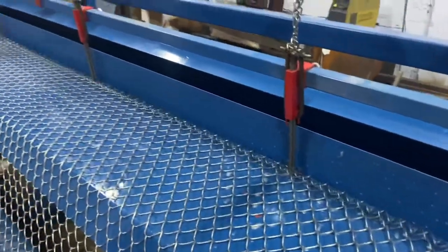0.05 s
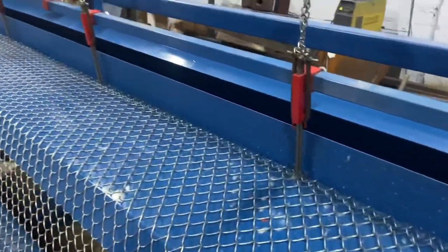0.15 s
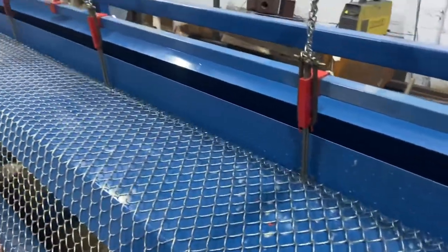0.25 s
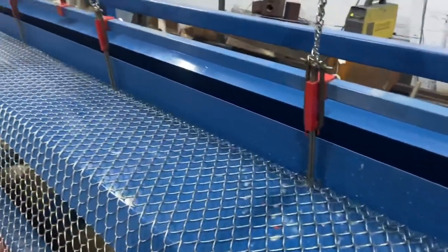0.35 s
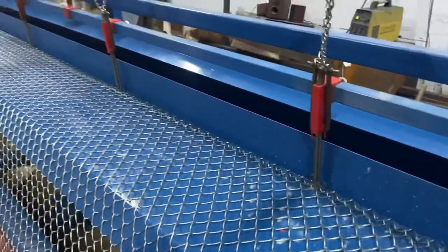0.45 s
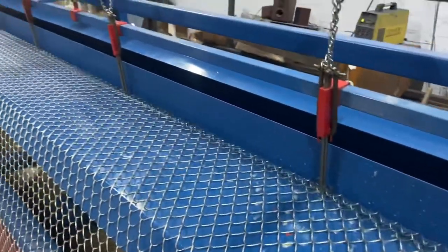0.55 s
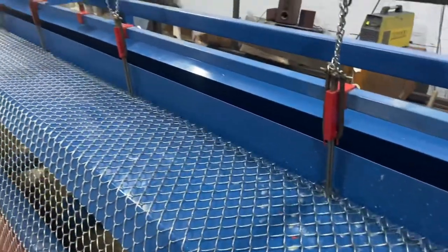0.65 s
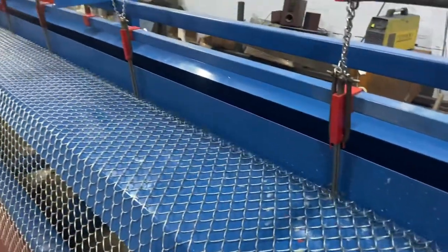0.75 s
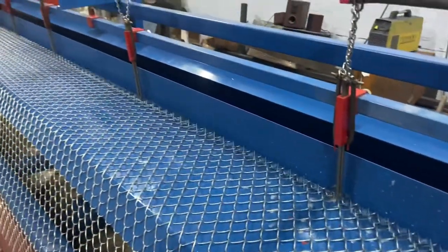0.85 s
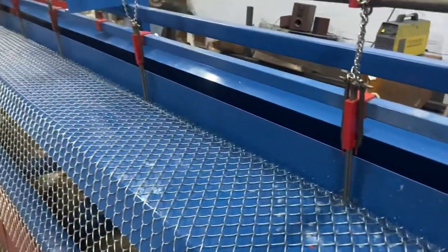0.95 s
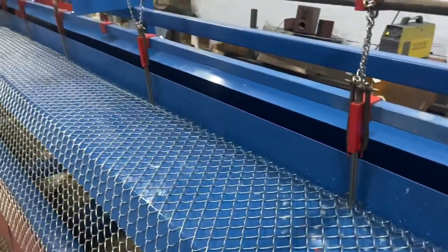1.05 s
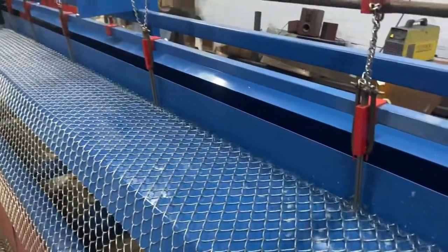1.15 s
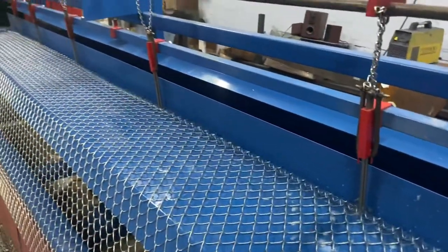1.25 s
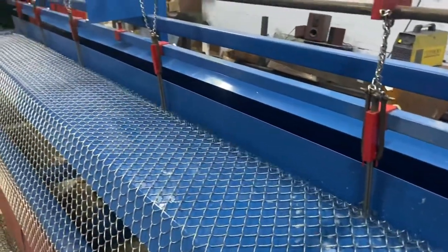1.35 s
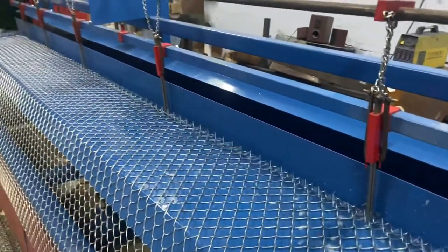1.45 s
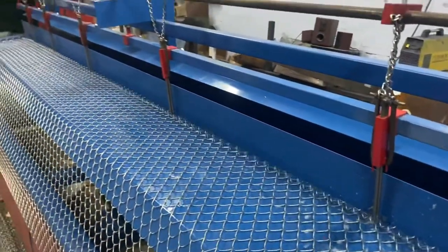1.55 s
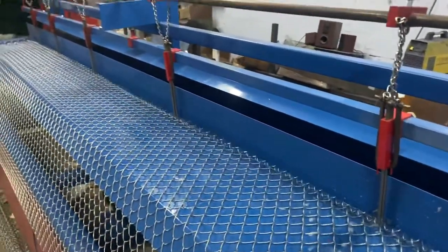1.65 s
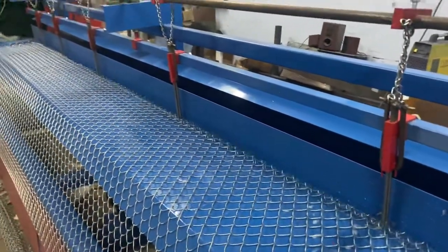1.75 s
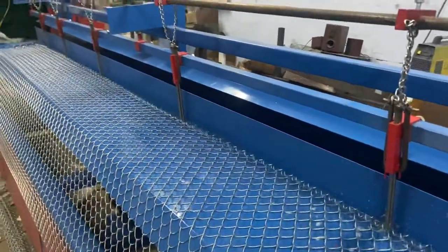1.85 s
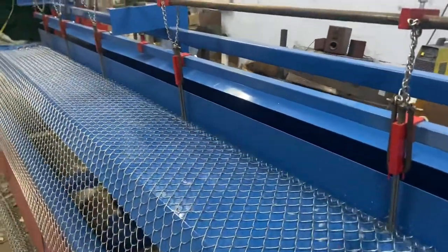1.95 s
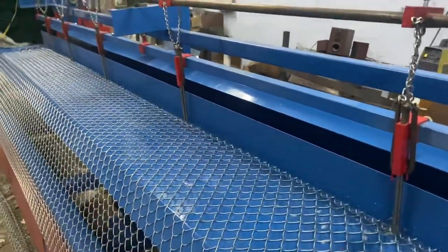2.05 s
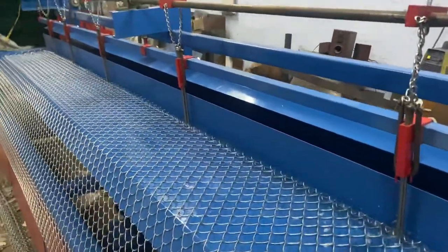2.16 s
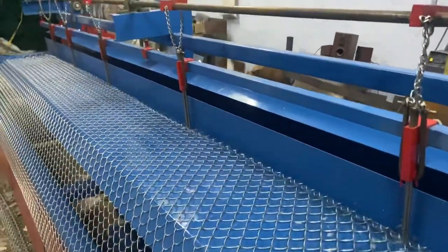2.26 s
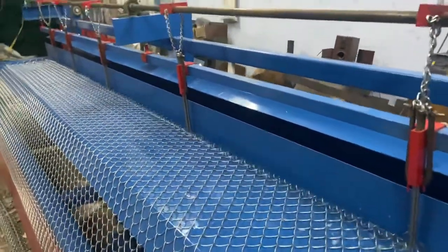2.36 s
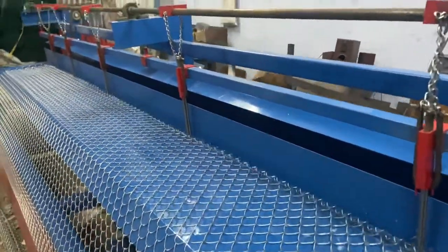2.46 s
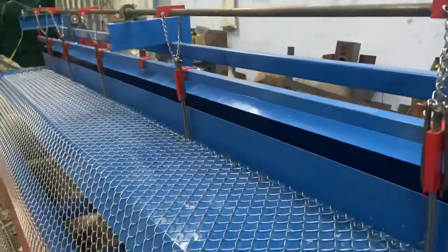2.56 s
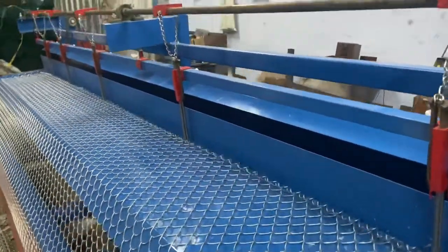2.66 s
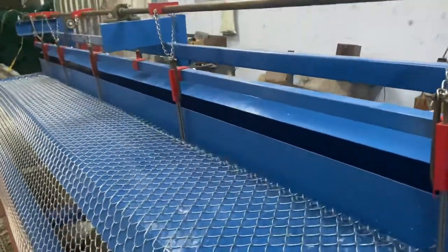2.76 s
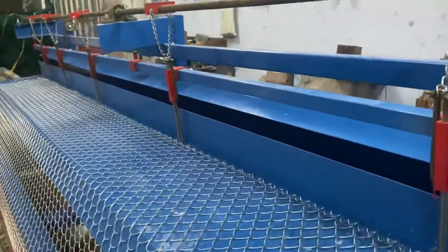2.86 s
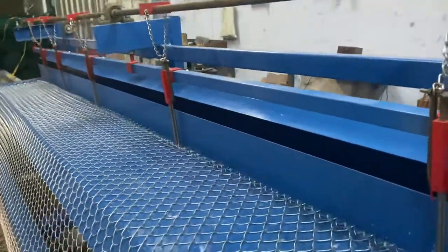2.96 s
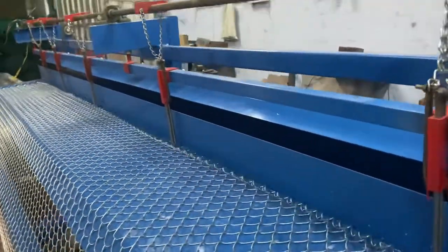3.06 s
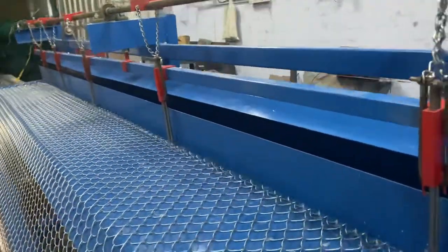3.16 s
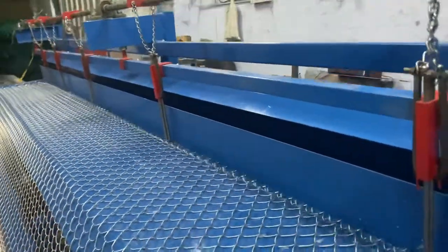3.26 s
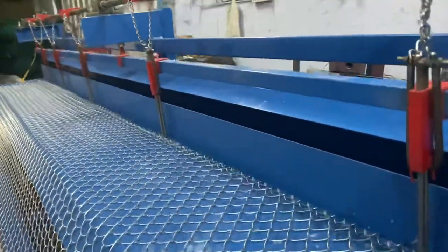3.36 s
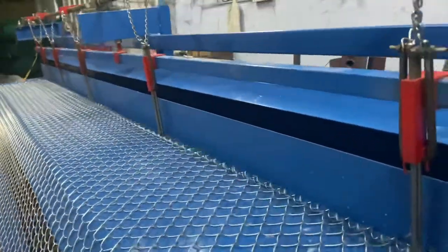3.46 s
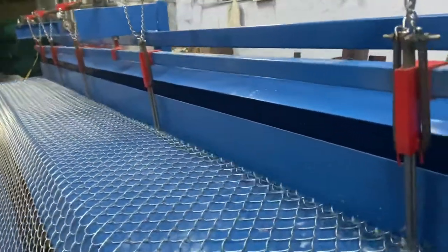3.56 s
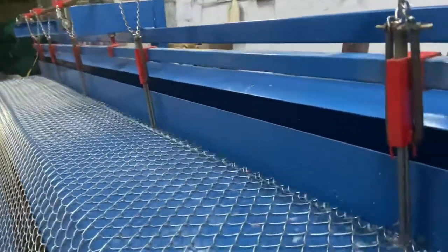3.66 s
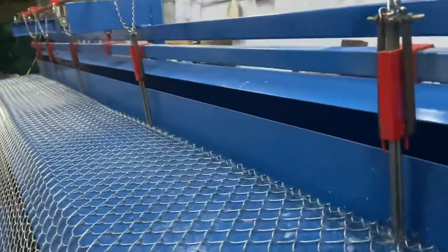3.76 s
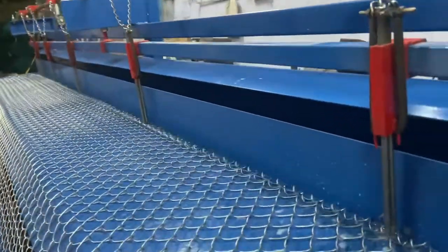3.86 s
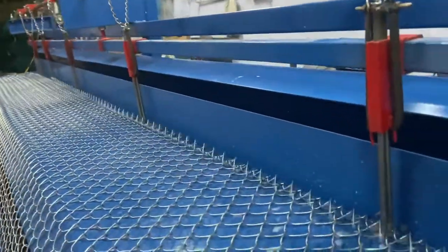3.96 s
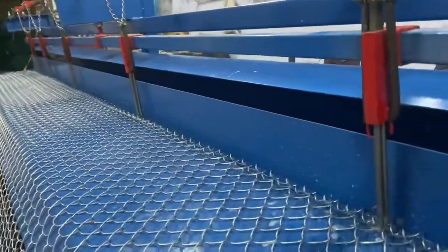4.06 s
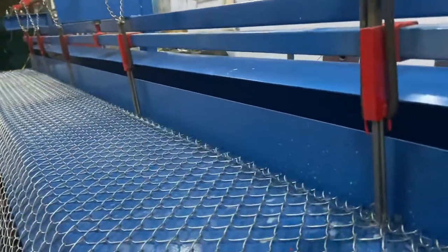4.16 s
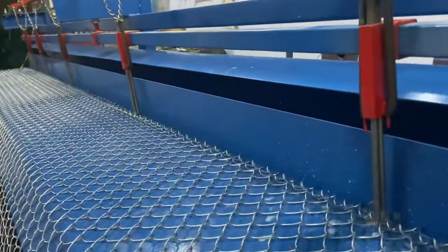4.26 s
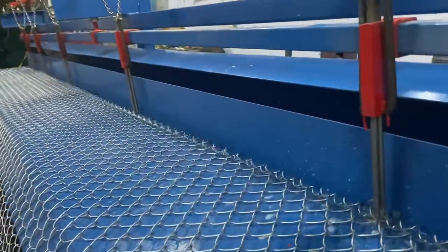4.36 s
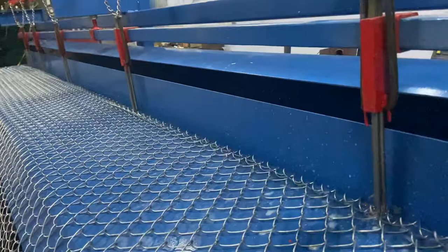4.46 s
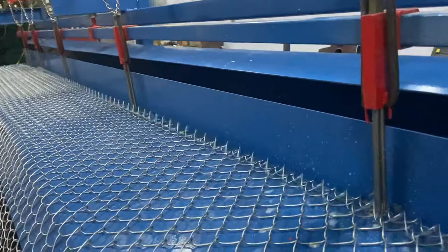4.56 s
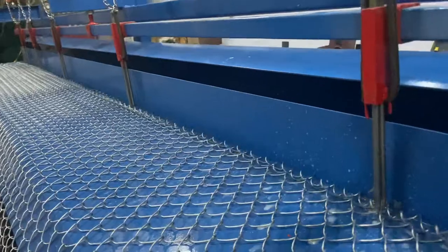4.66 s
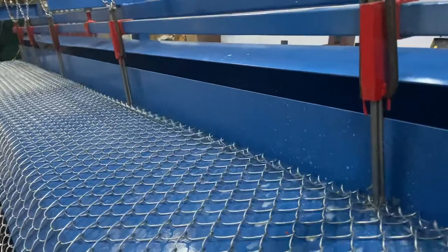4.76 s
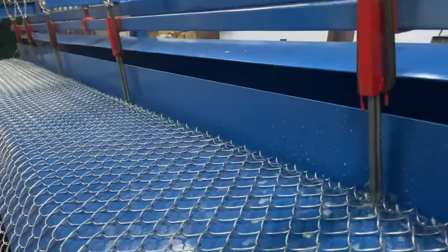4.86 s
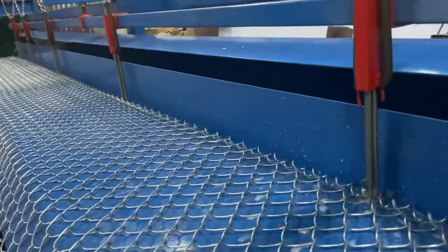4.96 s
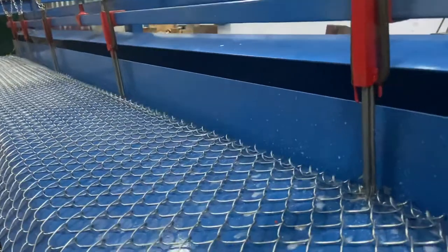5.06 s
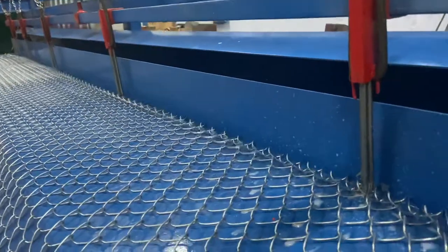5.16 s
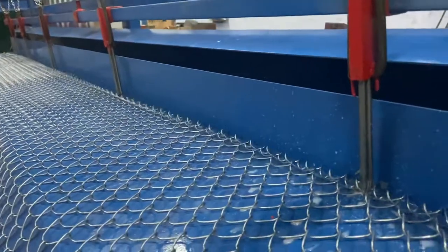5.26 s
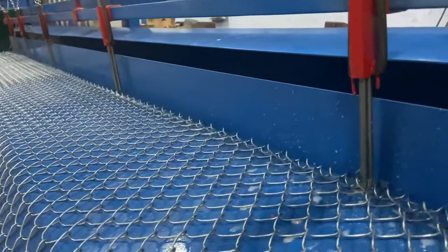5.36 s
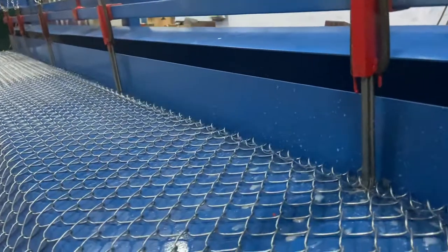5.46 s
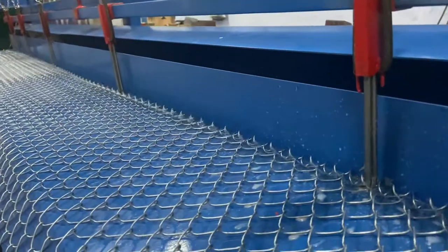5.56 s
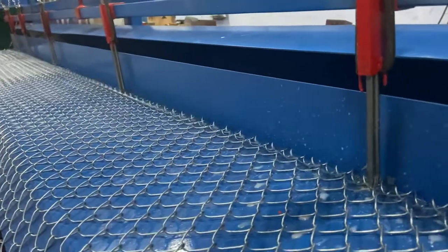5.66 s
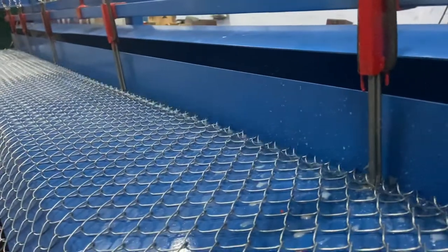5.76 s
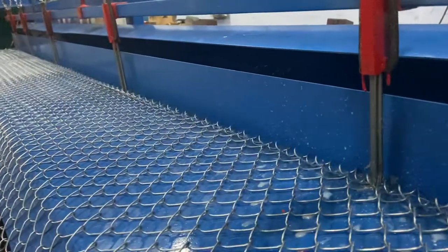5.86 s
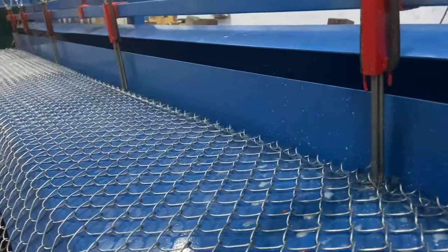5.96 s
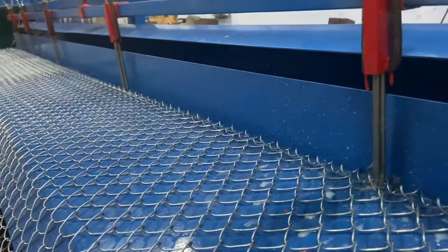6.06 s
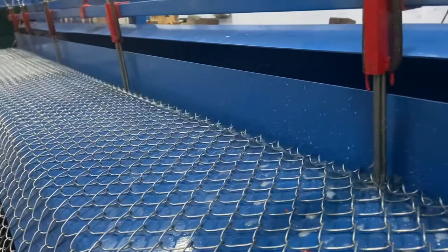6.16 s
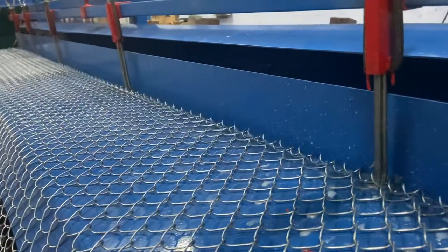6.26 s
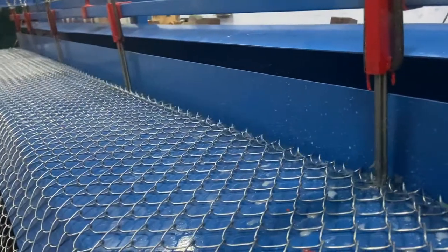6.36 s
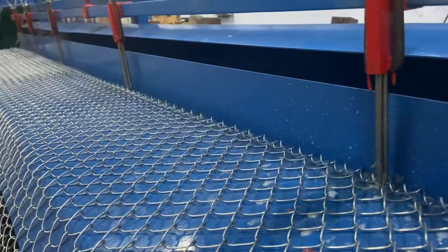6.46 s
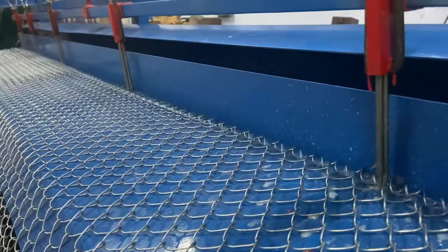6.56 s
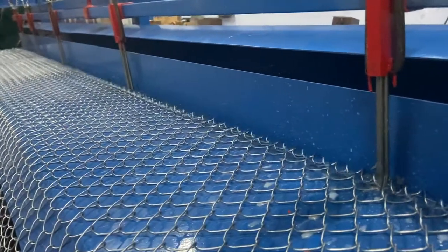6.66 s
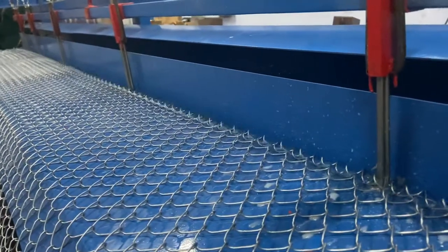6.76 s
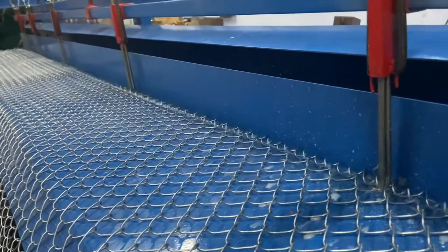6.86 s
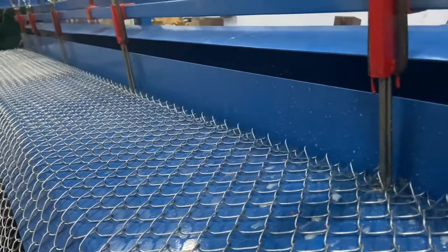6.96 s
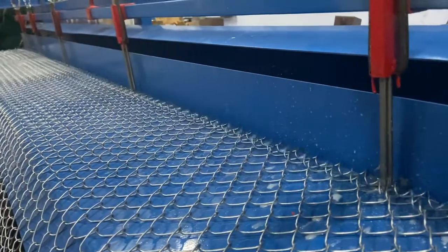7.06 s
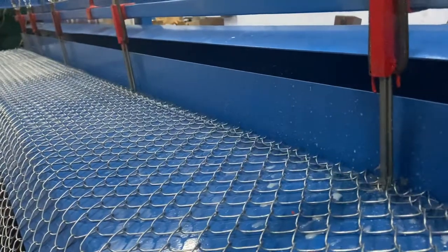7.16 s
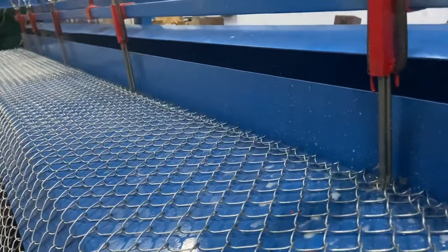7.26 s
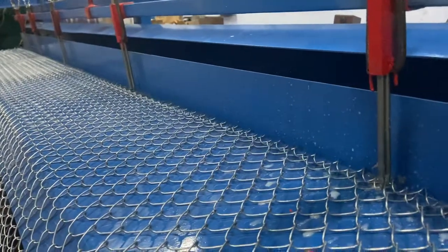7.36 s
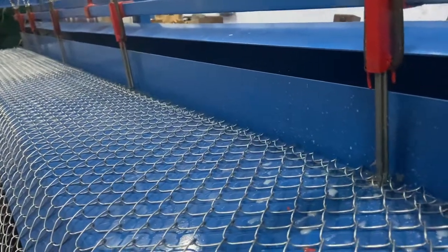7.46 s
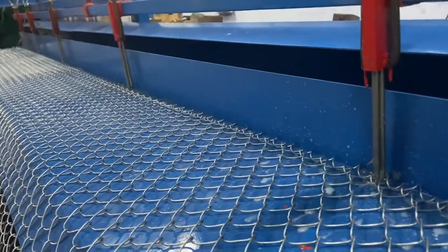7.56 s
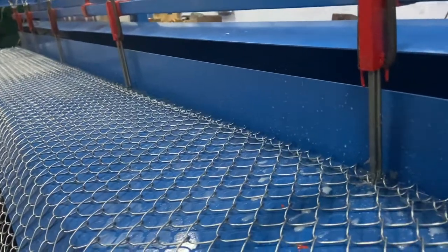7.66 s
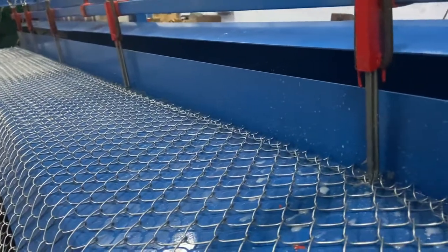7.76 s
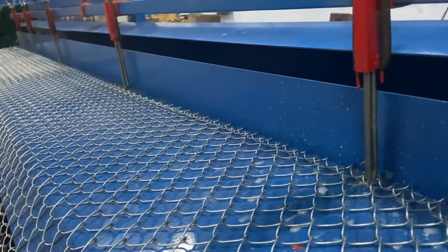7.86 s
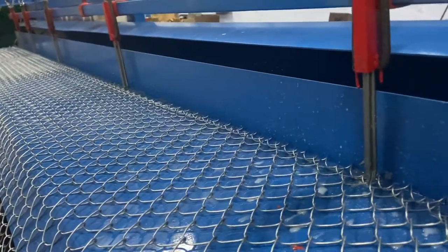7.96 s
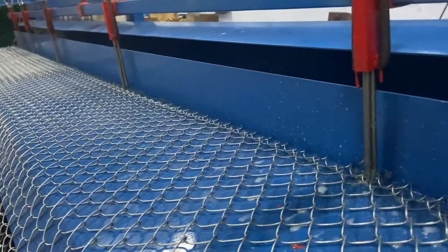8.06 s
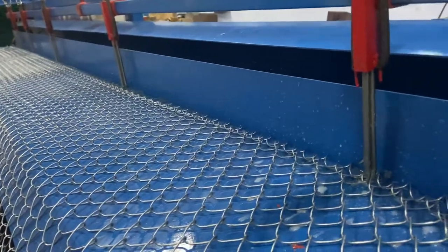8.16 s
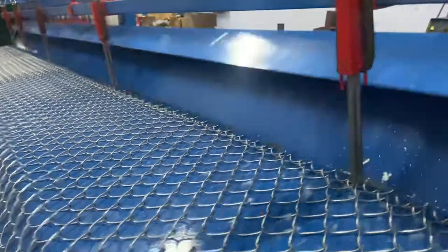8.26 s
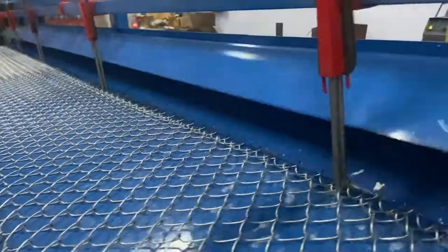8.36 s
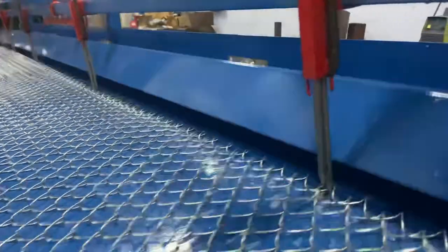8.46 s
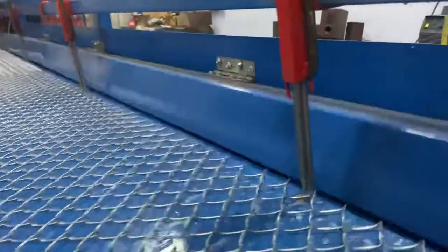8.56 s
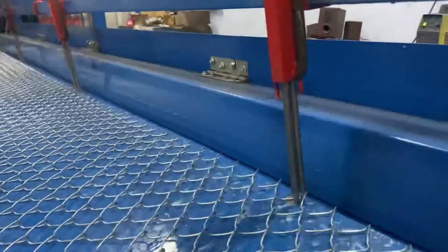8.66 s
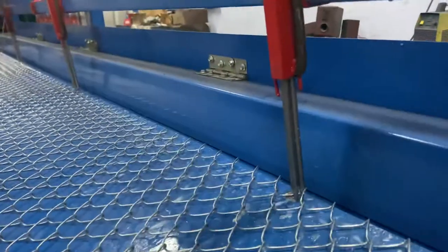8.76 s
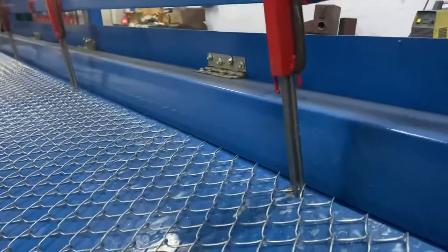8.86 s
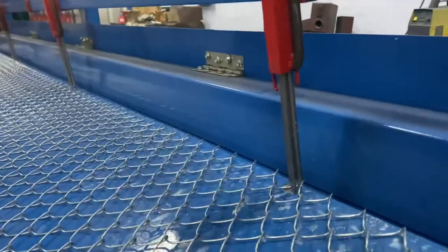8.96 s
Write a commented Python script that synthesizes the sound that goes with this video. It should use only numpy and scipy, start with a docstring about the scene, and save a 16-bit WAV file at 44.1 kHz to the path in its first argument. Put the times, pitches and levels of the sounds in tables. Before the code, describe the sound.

Close to a weaving machine, thin steel wire ticks, slaps, drags and jingles in a tight mechanical rhythm for almost seven seconds. Gears whirr underneath. Feeding then cuts out; light mesh rustles and a hard cutter bang, slightly right, ring in the hall. After a brief lull, low rumbling, scraping, two loud steel clanks and a singing hinge finish it.

```python
"""In a steel hall, a chain-link weaving machine screws a wire spiral into the mesh, ten half-turns a second.
The wire ticks, slaps, drags and rattles: noise grains and short ringing modes. Boom, gear noise and hum lie below.
The feed stops, a cutter bangs, and a long steel trough swings open with a rumble and two clanks: noise bursts
and struck modes. Mesh scrapes over sheet steel, a creak climbs and a hinge sings, both as gliding sines.
Two microphone ports hear it, the left a little late."""
import sys
import numpy as np
from scipy import signal
from scipy.fft import rfft, irfft, next_fast_len
from scipy.io import wavfile
from scipy.ndimage import uniform_filter1d, map_coordinates

SR = 44100
rng = np.random.default_rng(int(sys.argv[2]) if len(sys.argv) > 2 else 0)


def put_to_file(sound):
    """Save the sound as 16-bit audio at rate SR, in the file named by the first command-line argument."""
    columns = np.atleast_2d(sound).T  # one column per channel
    safe = np.clip(columns, -1, 1)
    whole_steps = np.round(safe * 32767)
    wavfile.write(sys.argv[1], SR, whole_steps.astype(np.int16))


N = 396900
T = np.arange(N) / SR  # time_s of every sample
QUADRATURE = np.c_[[0, np.pi / 2]]  # phase of the two streams in radians


def amp(db):
    """Decibels to an amplitude factor."""
    return 10 ** (np.asarray(db) / 20)


def unit(x):
    """Scale to an RMS of one."""
    return x / np.sqrt(np.mean(x ** 2) + 1e-20)


def along(points, hz):
    """Read (frequency_hz, value) points on a log frequency axis."""
    f, v = np.transpose(points)
    return np.interp(np.log(hz + 1), np.log(f + 1), v)


def curves(rows):
    """One value per sample for each column; -120 before the first row, the last value after the end."""
    s, *columns = np.transpose(rows)
    return [np.interp(T, s, column, left=-120) for column in columns]


def wobble(rate):
    """A smooth random curve with rate knots a second."""
    knots = rng.standard_normal(int(N * rate / SR) + 4)
    return map_coordinates(knots, [np.arange(N) * rate / SR])


def filtered(x, response):
    """Multiply the spectrum of x by a complex response of frequency."""
    m = next_fast_len(N + SR // 4)
    return irfft(rfft(x, m) * response(np.fft.rfftfreq(m, 1 / SR)), m)[..., :N]


def grit(spiky_db, rate):
    """Two unrelated noise streams of tiny contacts whose sizes scatter together, rate knots a second."""
    knots = rng.standard_normal(int(N * rate / SR) + 2)
    sizes = np.interp(np.arange(N) * rate / SR, np.arange(len(knots)), knots)
    return unit(rng.standard_normal((2, N)) * amp(spiky_db * sizes))


def colour(spectrum, modes=()):
    """A response of unit mean power: a broad spectrum with resonances standing on it."""
    def response(hz):
        peaks = sum(amp(db) * 1j * hz * width / (centre * centre - hz * hz + 1j * hz * width)
                    for centre, width, db in modes)
        gain = amp(along(spectrum, hz)) * (1 + peaks)
        return gain / np.sqrt(np.mean(abs(gain) ** 2))
    return response


def bursts(times, db, t60, rise):
    """Envelope of contacts that swell over rise s and die away; times may lie up to a second before zero."""
    power, t = np.zeros(N + 2 * SR), np.arange(SR // 3) / SR
    shape = amp(-2 * 60 * t / t60) * (1 - np.exp(-t / rise)) ** 2
    for s, level in np.broadcast(times, db):
        power[round((s + 1) * SR):][:len(t)] += amp(2 * level) * shape
    return np.sqrt(power[SR:SR + N])


def swells(rows, rise_db_per_s, fall_db_per_s):
    """One gain curve per level column: each row rises, holds and falls away; powers add."""
    power = 0
    for s, hold, *db in rows:
        before, after = np.maximum(s - T, 0), np.maximum(T - s - hold, 0)
        shape_db = -rise_db_per_s * before - fall_db_per_s * after
        power = power + amp(2 * (np.c_[db] + shape_db))
    return np.sqrt(power)


def patchy(x, depth_db):
    """Shift the colour in small random patches of time and frequency, as when other parts touch."""
    z = signal.stft(x, nperseg=256)[2]
    field = rng.standard_normal(z.shape[1:])
    for axis in (0, 1):
        field = uniform_filter1d(field, size=6, axis=axis)
    return signal.istft(z * amp(depth_db * unit(field)), nperseg=256)[1][:, :N]


# Floor boom, motor rumble, groan of the moving linkage, gear noise: frequency_hz, relative level_db per Hz
BOOM_SPECTRUM = [(20, -50), (38, -19), (51, 2), (65, -14), (100, -18), (200, -57)]
RUMBLE_SPECTRUM = [(30, -38), (50, -13), (85, 2), (103, -1), (118, -5), (135, 0.5), (200, -1.5), (330, -7),
                   (600, -14.5), (1200, -56)]
LINKAGE_SPECTRUM = [(30, -40), (60, -9), (100, -4), (160, 1.5), (250, -3.5), (400, -5), (700, -15),
                    (1300, -47.5)]
GEAR_SPECTRUM = [(80, -57), (140, -5), (230, -3), (350, -2), (520, -0.5), (900, 1.5), (1400, -3),
                 (3000, -5), (8000, -20)]
# Resonances of the gear casing: frequency_hz, width_hz, level_db over the spectrum
GEAR_CASING_MODES = [(146, 8, 0), (200, 8, -5), (226, 12, 4), (247, 7, 2), (275, 10, -1), (326, 20, 0),
                     (435, 12, -3), (499, 8, -2), (568, 14, -1), (660, 16, -2), (740, 12, -1),
                     (949, 10, -3)]
# Strokes of cutter and trough linkage: start_s, hold_s, boom_db, groan_db, gears_db
LINKAGE_STROKES = [(7.1, 0.25, -60, -43.5, -37), (7.36, 0.031, -53, -33.5, -35.5),
                   (8.105, 0.01, -58, -53, -47), (8.15, 0.03, -54, -36, -47), (8.21, 0.05, -39, -32, -40.5),
                   (8.34, 0.043, -36, -30, -28), (8.55, 0.044, -52, -40, -32.5),
                   (8.85, 0.029, -47, -42, -41)]
STROKE_RISE_DB_PER_S, STROKE_FALL_DB_PER_S = 173, 67.5
# Steady drive: boom_db, rumble_db, gears_db
FEEDING_DB, RESTING_DB = (-61, -48, -30.5), (-56, -48, -53.5)
FEED_STOP_S = 6.85
GEARS_FADE_DB_PER_S, COAST_DB_PER_S = 0.55, 76


def drive():
    """Boom and motor rumble come through the floor as low noise; linkage groans and gears rattle a casing."""
    feeding = swells([(0.011, FEED_STOP_S, *FEEDING_DB)], 0, COAST_DB_PER_S)
    feeding[2] *= amp(-GEARS_FADE_DB_PER_S * T)
    strokes = swells(LINKAGE_STROKES, STROKE_RISE_DB_PER_S, STROKE_FALL_DB_PER_S)
    resting = amp(np.c_[list(RESTING_DB)]) * (T > FEED_STOP_S)
    boom, _, gears = np.sqrt(feeding ** 2 + strokes ** 2 + resting ** 2)
    rumble = np.hypot(feeding[1], resting[1])
    groan = strokes[1] * amp(0.43 * wobble(10))

    def noise(spectrum):
        return filtered(rng.standard_normal((2, N)), colour(spectrum))

    low = boom * noise(BOOM_SPECTRUM) + rumble * noise(RUMBLE_SPECTRUM) + groan * noise(LINKAGE_SPECTRUM)
    casing = filtered(grit(1.0, 150), colour(GEAR_SPECTRUM, GEAR_CASING_MODES))
    return low + gears * amp(0.76 * wobble(12)) * patchy(casing, depth_db=1.0)


# Notes of the feeding motor: pitch_hz, level_db at the start
MOTOR_NOTES = [(146, -52), (226, -48), (247, -50)]


def hum():
    """The motor's sine notes waver in pitch and level, fade with the gears and coast down; first stream only."""
    fade_db = -GEARS_FADE_DB_PER_S * T - COAST_DB_PER_S * np.maximum(T - FEED_STOP_S, 0)
    notes = np.zeros(N)
    for hz, db in MOTOR_NOTES:
        level = amp(db + fade_db + 2.5 * wobble(7))
        notes += level * np.sin(2 * np.pi * np.cumsum(hz * (1 + 0.012 * wobble(6))) / SR)
    return notes * np.c_[[1, 0]]


# Resonances of the wire: frequency_hz, width_hz, level_db over the spectrum
WIRE_RESONANCES = [(4400, 250, -6), (5400, 500, -4), (7020, 160, -2), (8300, 300, -3), (9360, 200, -2),
                   (10490, 170, -2)]
# Mesh on sheet steel, and the sheet under load: frequency_hz, relative level_db per Hz
SCRAPE_SPECTRUM = [(300, -22), (900, -21), (2500, -5), (4500, 0), (6000, 5), (9000, -4), (14000, -7.5)]
GRIND_SPECTRUM = [(200, -30), (600, 3), (1200, 0), (2000, 0), (3500, -20), (8000, -39.5)]
# Wire sliding on sheet steel, first the spiral coasting to a stop, then loose mesh along the trough: start_s,
# hold_s, scrape_db, grind_db
MESH_SLIDES = [(6.86, 0.047, -36, -51), (7.07, 0.029, -31, -45), (7.2, 0.104, -40.5, -46),
               (7.31, .01, -48, -39), (7.5, 0.058, -41, -41.5), (8.108, 0.018, -55, -38.5),
               (8.28, 0.069, -31.5, -34.5), (8.43, 0.17, -31, -49), (8.6, .01, -28, -44),
               (8.86, 0.028, -52, -51)]
SLIDE_RISE_DB_PER_S, SLIDE_FALL_DB_PER_S = 500, 201


def slide():
    """Wire loops scrape over sheet steel as resonant grit, and the sheet grinds under them."""
    scrape, grind = swells(MESH_SLIDES, SLIDE_RISE_DB_PER_S, SLIDE_FALL_DB_PER_S)
    scrape = scrape * filtered(grit(1.5, 440), colour(SCRAPE_SPECTRUM, WIRE_RESONANCES))
    grind = grind * filtered(grit(2.0, 300), colour(GRIND_SPECTRUM))
    return patchy(scrape + grind, depth_db=1.5)


# A thin creak climbs as the trough starts to move: time_s, pitch_hz, level_db
TROUGH_CREAK = [(8.018, 2430, -62), (8.023, 2480, -46), (8.038, 2700, -49), (8.05, 2900, -52),
                (8.064, 2960, -45), (8.076, 2960, -58), (8.09, 2960, -100)]


def creak():
    """Dry friction sings one thin, nervous sine that glides upward."""
    hz, db = curves(TROUGH_CREAK)
    turn = 2 * np.pi * np.cumsum(hz * (1 + 0.012 * wobble(300))) / SR
    return amp(db + 3 * wobble(200)) * np.sin(turn + QUADRATURE)


# The hinge sings as the trough settles: time_s, pitch_hz, level_db
HINGE_NOTE = [(8.79, 580, -60), (8.826, 580, -39), (8.85, 597, -36), (8.87, 590, -35), (8.895, 597, -34),
              (8.916, 596, -38), (8.93, 588, -50), (8.955, 586, -33.5), (8.968, 584, -37),
              (8.982, 582, -54), (9.0, 550, -39)]
OVERTONE_RATIO, OVERTONE_DB = 2.04, -7  # against the hinge's note
OVERTONE_S, OVERTONE_WIDTH_S = 8.89, 0.04  # strongest here, 6 dB weaker one width away


def hinge():
    """A rubbing joint gives a slightly unsteady sine and an overtone just over its octave."""
    hz, db = curves(HINGE_NOTE)
    turn = 2 * np.pi * np.cumsum(hz * (1 + 0.003 * wobble(60))) / SR
    overtone_db = OVERTONE_DB - 6 * ((T - OVERTONE_S) / OVERTONE_WIDTH_S) ** 2
    overtone = amp(overtone_db) * np.sin(OVERTONE_RATIO * turn)
    return amp(db + 1.4 * wobble(90)) * (np.sin(turn + np.c_[[0, 1.3]]) + overtone)


def pings(times, db, count=5):
    """Each contact sets a few wire loops ringing briefly, every loop at a pitch of its own."""
    out, t = np.zeros((2, N + SR)), np.arange(SR // 16) / SR
    chances = rng.random((len(times), 4, count, 1))
    for s, level, (late, pitch, size, share) in zip(times, db, chances):
        age = np.maximum(t - 0.011 * late, 0)
        hz = 4800 * 2 ** (1.1 * pitch)
        ring = amp(level - 10 * size - 60 * age / 0.07) * np.sin(2 * np.pi * hz * age)
        pan = np.hstack([np.cos(6 * share), np.sin(6 * share)])
        out[:, round(s * SR):][:, :len(t)] += pan.T @ ring
    return out[:, :N]


def struck(body, times, db):
    """Each blow rings the body's modes at new strengths, slightly off pitch."""
    out, t = np.zeros((2, N + SR)), np.arange(SR // 3) / SR
    hz, mode_db, t60 = np.transpose(body)[:, :, None]
    chances = rng.standard_normal((len(times), 3, len(hz), 1))
    for s, level, chance in zip(times, db, chances):
        detuned_hz = hz * (1 + 0.011 * chance[2])
        turn = 2 * np.pi * detuned_hz * t + QUADRATURE[:, :, None]
        decay = amp(level + mode_db + 3.3 * chance[:2] - 60 * t / t60)
        modes = decay * np.sin(turn) * (1 - np.exp(-t / 0.00077))
        out[:, round(s * SR):][:, :len(t)] += modes.sum(axis=1)
    return out[:, :N]


# Clatter of the frame, dull thud, jolted mesh: frequency_hz, relative level_db per Hz
CLATTER_SPECTRUM = [(300, -16), (800, -9), (1500, -7), (2500, -3), (4000, -10), (6000, -11), (9000, -41),
                    (14000, -41)]
THUD_SPECTRUM = [(50, -14), (120, -5), (220, -13), (330, -2.5), (450, -0.5), (650, -0.5), (900, -1.5),
                 (1300, -5), (2500, -19), (5000, -54)]
SHAKEN_MESH_SPECTRUM = [(900, -46), (3000, -8), (5000, 2.5), (7000, 0), (10000, -4), (15500, -8.5)]


def frame(rows, body, ring_db, clatter_db, clatter_t60, thud_t60):
    """Every blow clatters, thuds and rings the struck body; the shaken mesh is returned separately."""
    s, db, thud_db, mesh_db = np.transpose(rows)
    clatter = bursts(s, db + clatter_db, clatter_t60, 0.0015) * grit(0.81, 600)
    clatter = filtered(clatter, colour(CLATTER_SPECTRUM))
    thud = bursts(s, db + thud_db - 5.5, thud_t60, 0.0013) * grit(1.0, 170)
    thud = filtered(thud, colour(THUD_SPECTRUM))
    mesh = bursts(s, db + mesh_db - 3.5, 0.13, 0.00072) * grit(0.91, 680)
    mesh = filtered(mesh, colour(SHAKEN_MESH_SPECTRUM, WIRE_RESONANCES))
    return clatter + thud + struck(body, s, db + ring_db), mesh + pings(s, db + mesh_db - 11)


# Modes of the tick: pitch_hz
TICK_PITCHES = [5350, 5950, 7020, 8400, 9380, 10490]
# How those modes ring: t60_s, relative level_db while the spiral is short, level_db at full length
TICK_RINGING = [(.06, -12, -7), (.06, -9, -8), (.1, -11, -2), (.045, -1, -6), (.05, -7, -13),
                (.06, -9, -10)]


def tick_ring(times, db):
    """The tick strikes the same modes each time, at new strengths and moments, slightly off pitch."""
    out, t = np.zeros((2, N + SR)), np.arange(SR // 12) / SR
    hz, (t60, short_db, full_db) = np.c_[TICK_PITCHES], np.transpose(TICK_RINGING)[:, :, None]
    chances = rng.standard_normal((len(times), 4, len(hz), 1))
    for s, level, (size, detune, share, late) in zip(times, db, chances):
        mode_db = short_db + (full_db - short_db) * s / times[-1] + 0.41 * size
        age = np.maximum(t - 0.0027 * abs(late), 0)
        tone = np.sin(2 * np.pi * hz * (1 + 0.0157 * detune) * age)
        ring = amp(level + mode_db - 60 * age / t60) * tone * (1 - np.exp(-age / 0.00072))
        out[:, round(s * SR):][:, :len(t)] += np.hstack([np.ones_like(share), share]).T @ ring
    return out[:, :N]


# Wire on wire, and the spiral's free end whipping along the mesh: frequency_hz, relative level_db per Hz
WIRE_SPECTRUM = [(300, -14.5), (900, -2), (1500, -8.5), (2500, -6), (3500, -3.5), (4500, 0.5), (5500, 2),
                 (6500, 1), (8000, -0.5), (10000, -5.5), (12000, -3.5), (14000, -7.5), (15500, -12)]
WHIP_SPECTRUM = [(300, -25.5), (1200, -7.5), (2500, 6), (5000, -50), (8000, 6), (11000, 4.5), (15500, -28)]
# Half-turns, levels before each layer's trim:
# tick_s, tick_db, slap_s after the tick, slap_db, rattle_s after the tick, rattle_db
HALF_TURNS = [(0.0073, -18.5, 0.012, -26, 0.053, -23.5), (0.109, -18.5, 0.009, -21, 0.041, -22),
              (0.211, -22.5, 0.0192, -20, 0.048, -20), (0.312, -16, 0.0064, -19, 0.057, -23),
              (0.418, -19.5, 0.019, -29, 0.058, -25), (0.5148, -15.5, 0.01, -21, 0.088, -20.5),
              (0.617, -18.5, 0.0097, -35, 0.052, -30), (0.7176, -17, 0.012, -14, 0.033, -22.5),
              (0.8105, -20, 0.0101, -32, 0.053, -23), (0.9164, -19, 0.014, -16, 0.076, -29),
              (1.018, -17.5, 0.013, -29, 0.052, -22), (1.1164, -17, 0.011, -16, 0.05, -33),
              (1.2147, -19, 0.014, -15, 0.056, -27), (1.3172, -16.5, 0.011, -14.5, 0.042, -27),
              (1.417, -17.5, 0.018, -16.5, 0.053, -23.5), (1.5202, -17.5, 0.013, -14.5, 0.045, -26.5),
              (1.6204, -17, 0.0112, -18.7, 0.044, -23), (1.719, -19, 0.015, -22, 0.043, -25),
              (1.821, -21, 0.014, -14.5, 0.057, -44), (1.92, -19.5, 0.03, -29, 0.04, -32),
              (2.021, -18, 0.0096, -16.5, 0.05, -36), (2.1162, -25, 0.018, -12.5, 0.061, -24),
              (2.2224, -23.5, 0.014, -14, 0.041, -30), (2.32, -19, 0.021, -24, 0.05, -32),
              (2.4198, -18.5, 0.014, -18, 0.058, -26), (2.525, -23, 0.0093, -15, 0.041, -32),
              (2.6163, -21.5, 0.019, -16.5, 0.048, -25), (2.721, -22.5, 0.013, -14, 0.042, -21),
              (2.8205, -23.5, 0.014, -14, 0.046, -27), (2.9203, -18.5, 0.014, -15, 0.03, -22.5),
              (3.022, -20.5, 0.0074, -17, 0.047, -25), (3.123, -19, 0.012, -19, 0.038, -30.1),
              (3.217, -22, 0.02, -15, 0.06, -30), (3.321, -18.5, 0.019, -15.5, 0.053, -29.5),
              (3.4212, -17.5, 0.0144, -17.5, 0.029, -29), (3.5183, -24, 0.018, -18.5, 0.047, -24),
              (3.6188, -21, 0.014, -14.5, 0.053, -25), (3.7326, -20.5, 0.016, -14, 0.044, -43),
              (3.8184, -29, 0.0095, -16.5, 0.051, -24), (3.9192, -19, 0.021, -14, 0.05, -23),
              (4.016, -19.5, 0.018, -18, 0.078, -25), (4.1276, -19, 0.021, -14.5, 0.043, -22.5),
              (4.2187, -23, 0.012, -19, 0.062, -27), (4.3237, -21.5, 0.015, -18, 0.035, -25),
              (4.42, -20, 0.015, -17, 0.037, -28), (4.522, -24, 0.019, -13, 0.064, -28),
              (4.623, -17.5, 0.013, -16, 0.045, -30), (4.72, -19, 0.017, -22, 0.05, -21),
              (4.8224, -18.5, 0.017, -15, 0.052, -26), (4.9214, -22, 0.017, -15, 0.058, -23),
              (5.0244, -21, 0.014, -14, 0.044, -26), (5.1262, -24.5, 0.02, -14, 0.063, -27),
              (5.222, -26, 0.016, -15.5, 0.054, -21), (5.322, -28, 0.018, -13.5, 0.04, -23.5),
              (5.4264, -20.4, 0.014, -13, 0.06, -27), (5.5228, -30, 0.022, -14, 0.054, -21),
              (5.6233, -19, 0.013, -16, 0.046, -22.5), (5.7338, -25, 0.023, -14, 0.06, -25),
              (5.8259, -21, 0.011, -16.5, 0.045, -24), (5.9347, -22.5, 0.023, -16.5, 0.054, -46),
              (6.0203, -23.5, 0.0071, -15.5, 0.044, -20.5), (6.132, -24.2, 0.02, -14.5, 0.068, -27),
              (6.223, -23, 0.016, -16.5, 0.084, -24), (6.325, -28, 0.02, -13.5, 0.055, -23),
              (6.4235, -27, 0.023, -17.5, 0.046, -24), (6.5358, -26.9, 0.022, -14, 0.11, -32),
              (6.6146, -24.1, 0.035, -19.5, 0.083, -26), (6.727, -34, 0.024, -14.5, 0.057, -23),
              (6.827, -42, 0.024, -14.5, 0.061, -28)]
HALF_TURN_S = 0.1


def spiral():
    """Each half-turn: a bright tick, a fuller slap, a long drag and a late rattle of the loops."""
    s, tick_db, slap_after, slap_db, late_after, late_db = np.transpose(HALF_TURNS)
    slap_s, late_s = s + slap_after, s + late_after

    def bright(hz):
        return colour(WIRE_SPECTRUM)(hz) * amp(5.7 * np.log2(hz / 7000 + 0.043))

    tick = filtered(bursts(s, tick_db + 6.5, 0.04, 0.0035) * grit(2.5, 900), bright)
    slap_edge = filtered(bursts(slap_s, slap_db - 4, 0.03, 0.002) * grit(2.2, 900), bright)
    ringing = tick_ring(s, tick_db + 4)

    slap = bursts(slap_s, slap_db + 0.5, 0.054, 0.003) + bursts(late_s, late_db, 0.17, 0.002)
    since = np.r_[s[0] - HALF_TURN_S, s]  # the half-turn before the first still drags
    drag_db = -19.5 + 0.072 * (np.r_[-20, tick_db] + 23)  # the drag swells with the tick
    drag = bursts(since - 0.001, drag_db, 0.4, 0.011)
    snaps = amp(-17) * grit(4.8, 2900)  # single sharp contacts among the rest
    rattle = patchy(slap * (grit(1.6, 500) + snaps) + drag * grit(0.82, 400), depth_db=1.5)
    rattle = filtered(rattle, colour(WIRE_SPECTRUM, WIRE_RESONANCES))

    loops = pings(slap_s, slap_db) + pings(late_s, late_db + 1.0)
    stray_s = s + 0.012 + 0.049 * rng.random((2, len(s)))  # loose loops knock early in the drag
    loops += pings(stray_s.ravel(), np.tile(tick_db, 2) - 7, count=3)

    # the whipping end is loudest while the spiral is short
    whip = bursts(since, -29 - 1.2 * since, 0.54, 0.0017) * grit(2.2, 600)
    return tick + slap_edge + ringing + rattle + loops + filtered(whip, colour(WHIP_SPECTRUM))


# Decay of the hall: frequency_hz, t60_s
HALL_DECAY = [(150, 1.8), (1000, 1.28), (4000, 0.85), (10000, 0.085)]


def hall(x):
    """Diffuse answer of the hall: the power fed into each band lingers and dies at its own speed."""
    hz, t, z = signal.stft(x[0], SR, nperseg=256)
    keep = amp(-2 * 60 * t[1] / along(HALL_DECAY, hz))
    # leaky power store, answering three frames late
    held = np.array([signal.lfilter([0, 0, 0, 1 - k], [1, -k], row) for k, row in zip(keep, abs(z) ** 2)])
    air = signal.stft(rng.standard_normal((2, N)), SR, nperseg=256)[2]
    tail = np.sqrt(held / np.mean(abs(air) ** 2)) * air
    return signal.istft(tail, SR, nperseg=256)[1][:, :N]


# Likeness of the two ports: frequency_hz, likeness from 0 to 1
PORT_LIKENESS = [(60, 1), (300, 0.82), (600, 0.6), (1200, 0), (2200, 0), (4200, 0.49), (5200, 0.3),
                 (6500, 0.59), (8500, 0.99), (16000, 0.82)]
# Phase by which the left leads, negative when late: frequency_hz, lead_radians
LEFT_LEAD = [(0, 0), (2410, -4.8), (4130, -6.3), (5680, -7.3), (6370, -6.1), (7490, -6.5), (8440, -9.2),
             (9560, -9.6), (10400, -12.4), (11600, -12.6), (12500, -15.5), (13800, -15.9), (14600, -18.9),
             (16600, -18.8)]
# Balance, left minus right: frequency_hz, level_db
PORT_TILT = [(60, -5), (110, 0.5), (200, -1.5), (380, -2.5), (700, -1.5), (1290, -1), (2380, 1),
             (4400, 0.0), (8120, 0.5), (15000, -0.5)]


def ports(pair):
    """Mix two unrelated streams to the ports' likeness, then give each port its lag and level."""
    def spread(hz):
        angle = np.arccos(np.clip(along(PORT_LIKENESS, hz), 0, 1)) / 2
        return np.array([np.cos(angle), np.sin(angle)])

    def left_and_right(hz):
        lead = np.interp(hz, *np.transpose(LEFT_LEAD))
        half = amp(along(PORT_TILT, hz) / 2) * np.exp(0.5j * lead)
        return np.array([half, 1 / half])

    shared, own = filtered(pair, spread)
    return filtered(np.array([shared + own, shared - own]), left_and_right)


# Blows in the frame, before each layer's trim: start_s, clatter_db, thud_db above it, shaken_mesh_db above it
FRAME_BLOWS = [(6.8515, -42, -15, 14), (7.015, -33.5, -27, 12.5), (7.0305, -37.5, -21, 19.5),
               (7.0447, -33.5, -12, 15), (7.12, -41, 11, -3), (7.19, -35.5, 8, 8.5),
               (7.227, -43, 12, -10.5), (7.247, -50, 7, -10), (7.264, -42, -4, 13), (7.298, -24, 3, -4),
               (7.3043, -15.5, 7, -2), (7.309, -20, -6, -21), (7.3184, -16, -15, -24),
               (7.352, -26, -15, -6), (7.372, -26, -12, -8), (7.4027, -26, -17, -5.5),
               (7.425, -34, -10, -18), (7.4901, -32.5, -11, 3.5), (7.512, -31.5, -14, 1),
               (7.7038, -39, 9.5, -27), (8.0195, -41, 5, -23), (8.043, -38, 7, -13), (8.0994, -41, 12, -17),
               (8.1444, -46.5, 15, -3), (8.193, -40.5, 12, 1), (8.2474, -29, 2.5, 7.5),
               (8.255, -29, -3, 9.5), (8.32, -30, -4, 11.5), (8.355, -13.5, 0.5, 5.5),
               (8.5969, -16, -9, 8.5), (8.6006, -8, -3.5, -11), (8.6084, -11, -17, -9)]
# Modes of the cutter head and of the trough: pitch_hz, relative level_db, t60_s
CUTTER_MODES = [(430, -3, .12), (555, 14, 0.088), (631, 10.5, 0.11), (760, 12.5, 0.08), (875, 6, 0.048),
                (1007, 10.5, 0.1), (1131, 6, 0.1), (1670, 4, 0.22), (1960, 5, 0.18), (2740, 8, .06),
                (3430, 2, .2), (3710, 3, .2), (3970, 0, .22), (3960, 3, .25), (4200, 0, .25), (4600, 5, .1)]
TROUGH_MODES = [(465, 16.5, 0.079), (555, 12, 0.12), (1176, 3, 0.11), (2530, 3, 0.06), (2950, 3, 0.12),
                (5250, -6, 0.1), (3910, 11, 0.087), (4600, 9, 0.092), (4860, -6, 0.067), (5730, -8, 0.18),
                (6340, 5, 0.09), (6460, -4, 0.095), (7391, -21.5, 0.15)]
TROUGH_MOVES_S = 7.9  # blows before this strike the cutter, later ones the trough
CUTTER_RIGHT_DB = 4  # the cutter stands to the right: right over left, on top of the ports' balance


def scene():
    """Sum the machine, let wire and blows excite the hall, and set the cutter to the right."""
    cutter_blows = [b for b in FRAME_BLOWS if b[0] < TROUGH_MOVES_S]
    trough_blows = [b for b in FRAME_BLOWS if b[0] > TROUGH_MOVES_S]
    cutter, jolt = frame(cutter_blows, CUTTER_MODES, ring_db=-19, clatter_db=-5.5,
                         clatter_t60=0.18, thud_t60=0.21)
    trough, shake = frame(trough_blows, TROUGH_MODES, ring_db=-23.5, clatter_db=-7.5,
                          clatter_t60=0.23, thud_t60=0.27)
    wire = spiral()
    blows = jolt + trough + shake
    room = hall(amp(-6.5) * wire + amp(-9.5) * (blows + cutter))
    rest = drive() + hum() + slide() + creak() + hinge() + blows + wire + room
    return ports(rest) + amp(np.c_[[-0.5, 0.5]] * CUTTER_RIGHT_DB) * ports(cutter)


LOW_HZ, TOP_HZ = 38, 15750  # rolls off below the first, silent from the second up


def record(dry):
    """The preamplifier rounds off the highest peaks; the band is limited at both ends."""
    rounded = dry / (1 + abs(dry / 0.97) ** 12) ** (1 / 12)
    return filtered(rounded, lambda hz: (hz < TOP_HZ) / np.sqrt(1 + (LOW_HZ / (hz + 1)) ** 8))


dry = scene()
out = record(dry)
put_to_file(out)
```